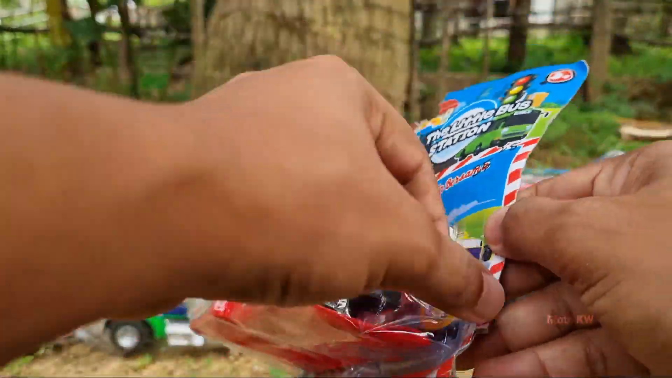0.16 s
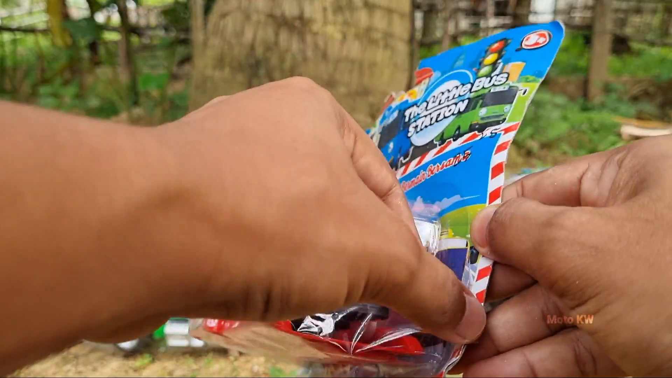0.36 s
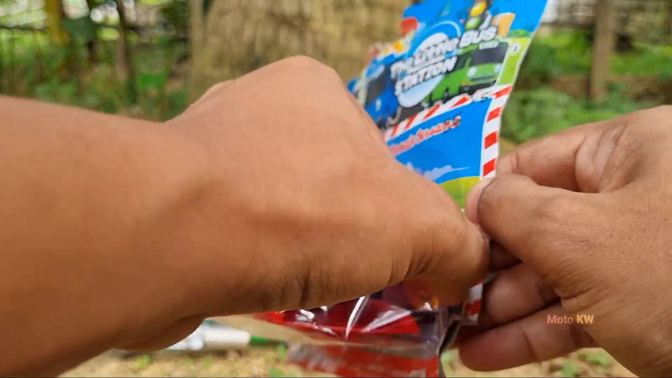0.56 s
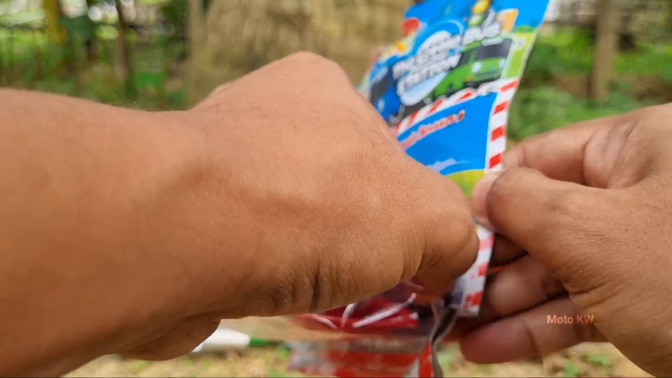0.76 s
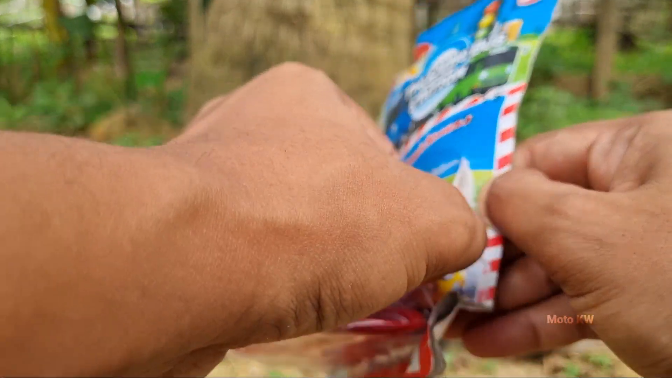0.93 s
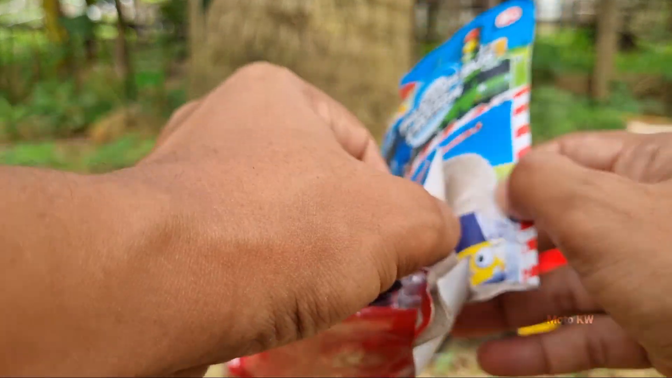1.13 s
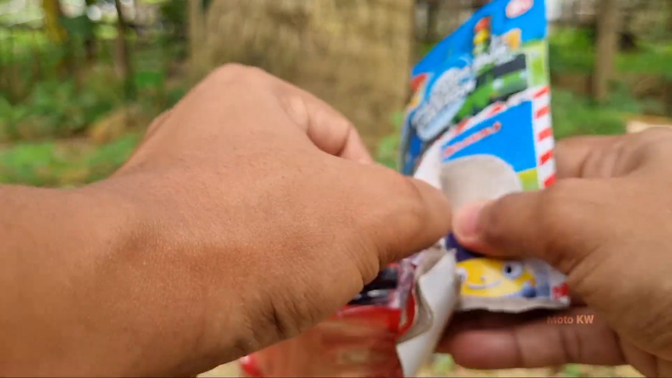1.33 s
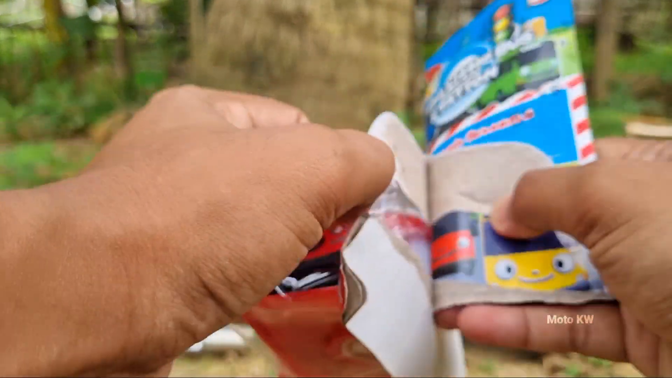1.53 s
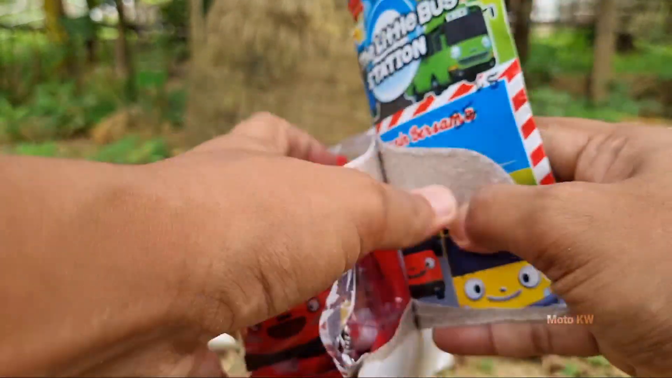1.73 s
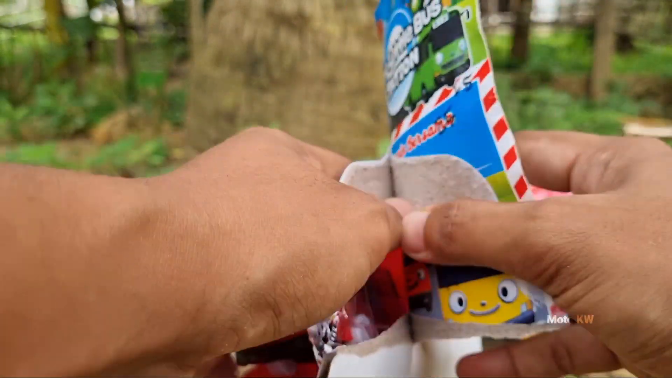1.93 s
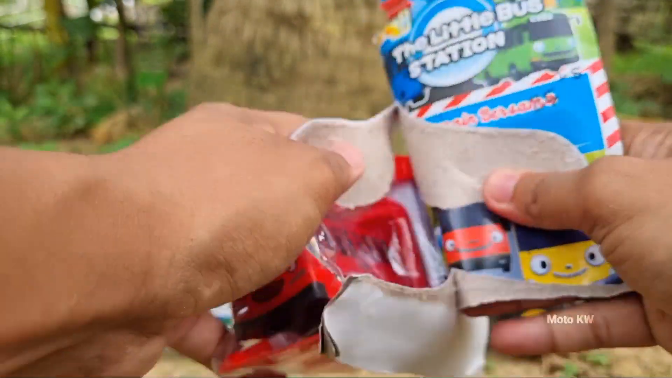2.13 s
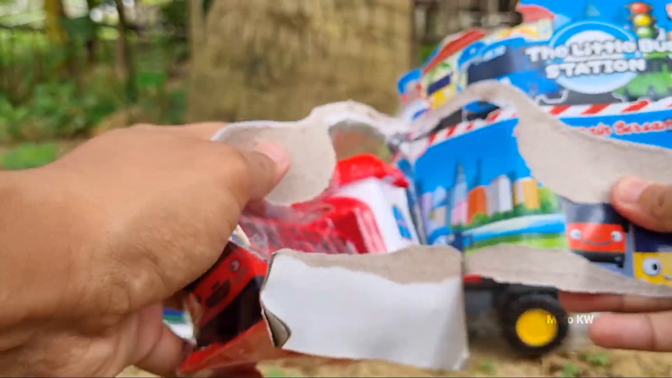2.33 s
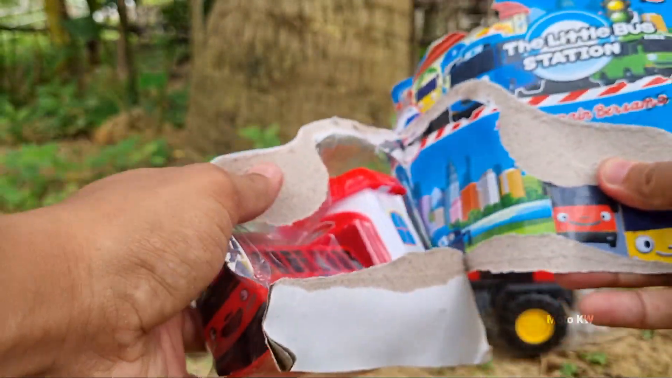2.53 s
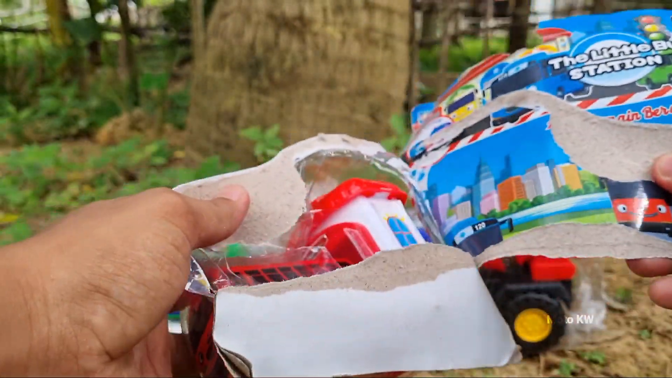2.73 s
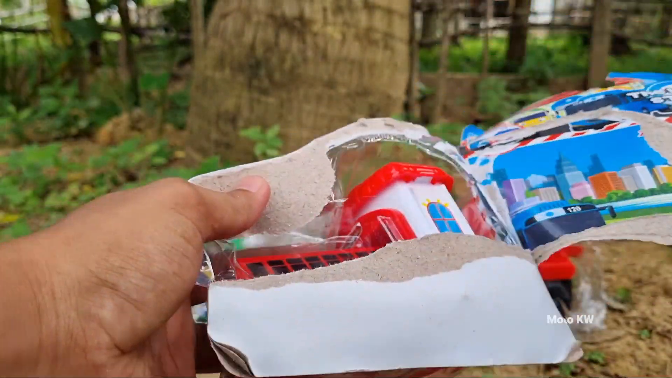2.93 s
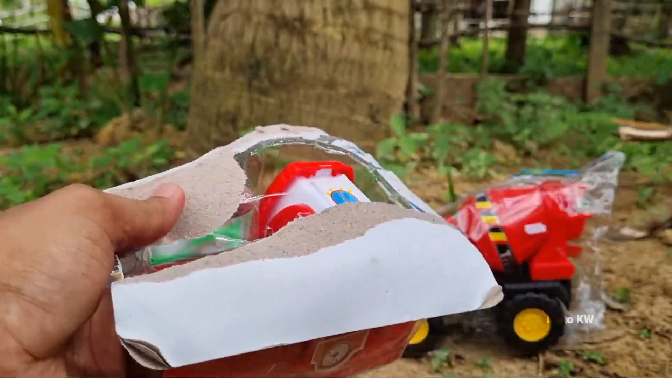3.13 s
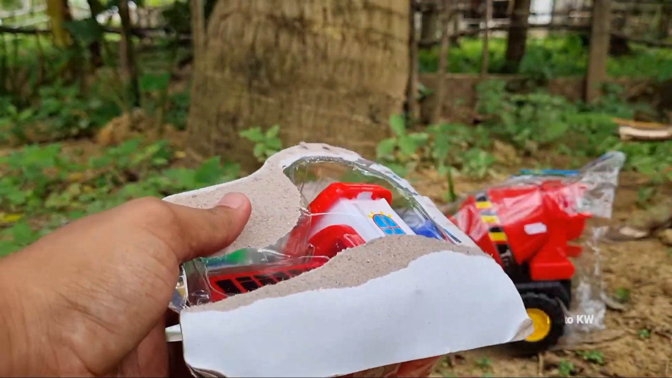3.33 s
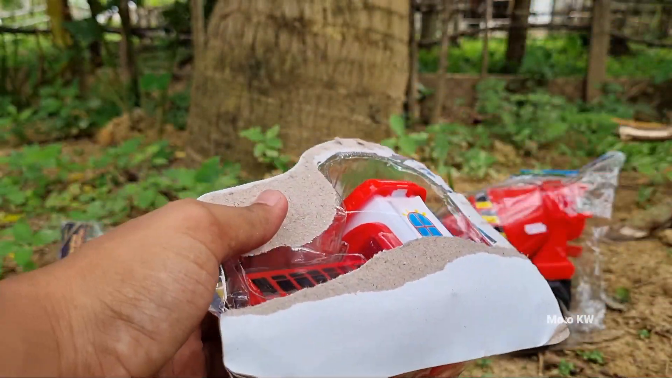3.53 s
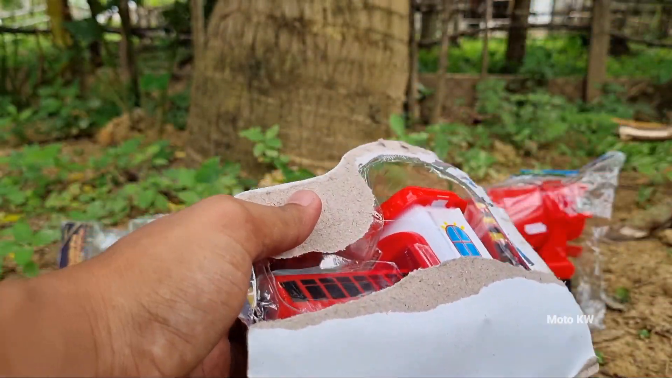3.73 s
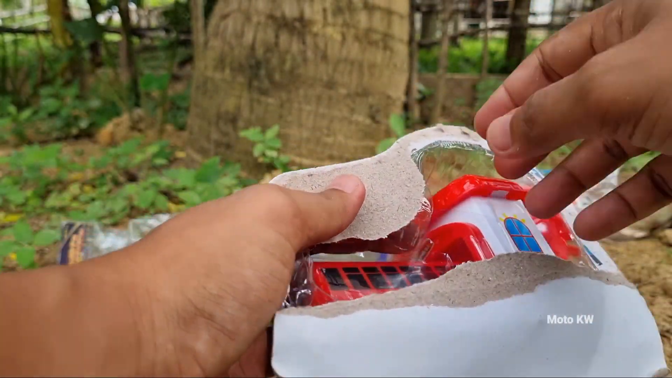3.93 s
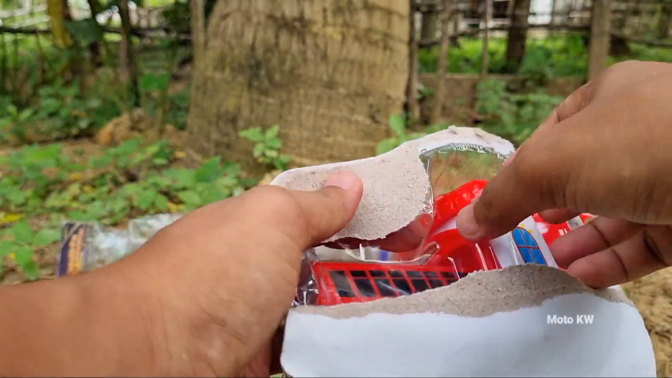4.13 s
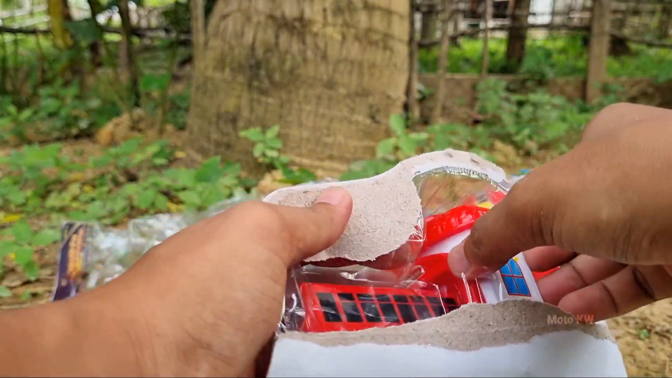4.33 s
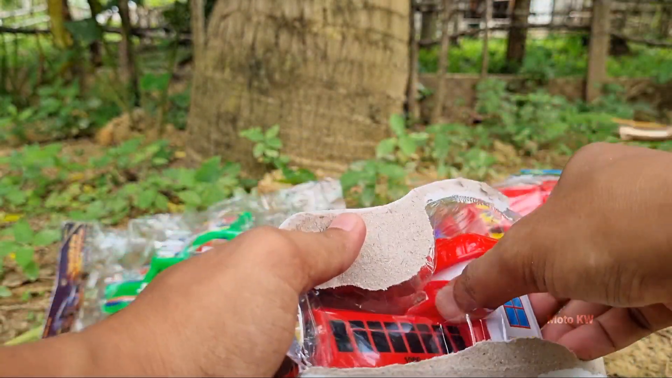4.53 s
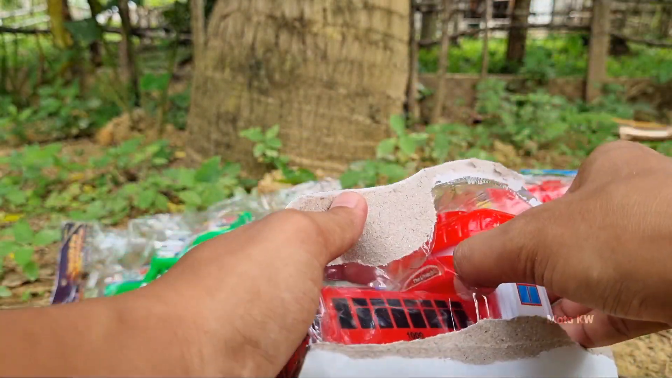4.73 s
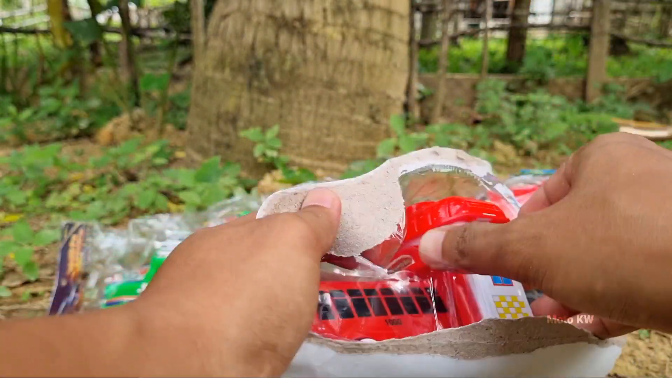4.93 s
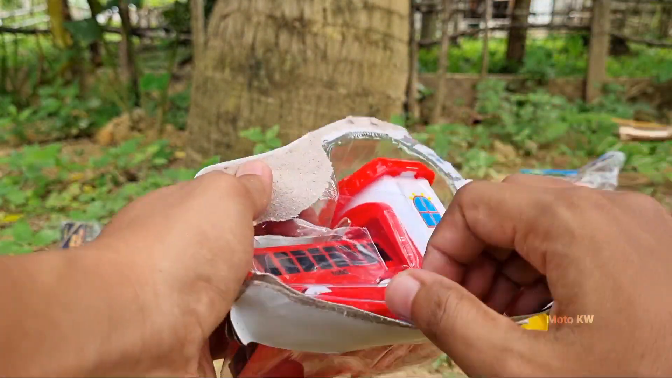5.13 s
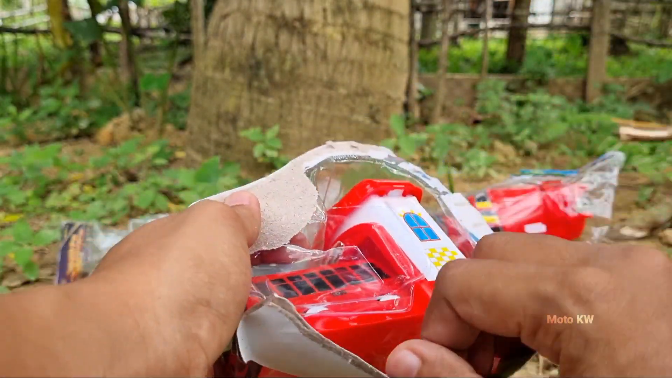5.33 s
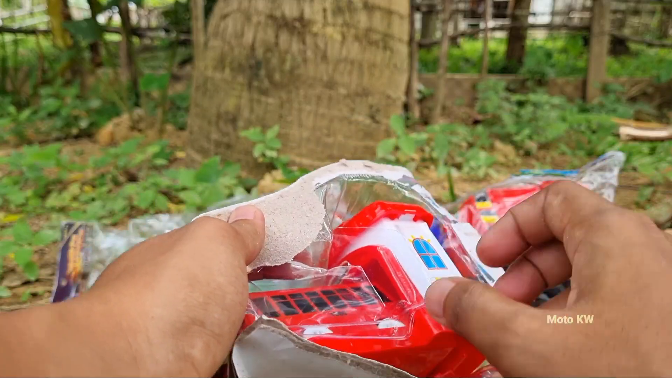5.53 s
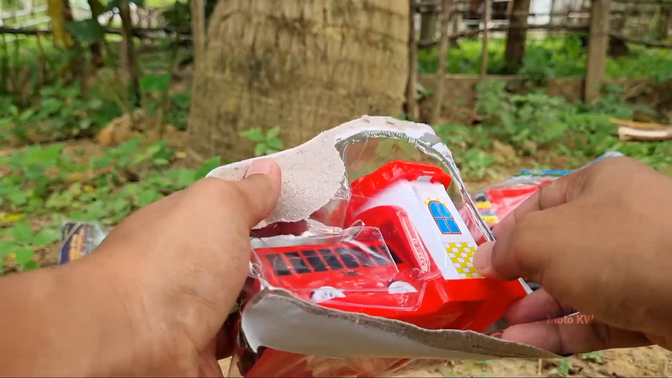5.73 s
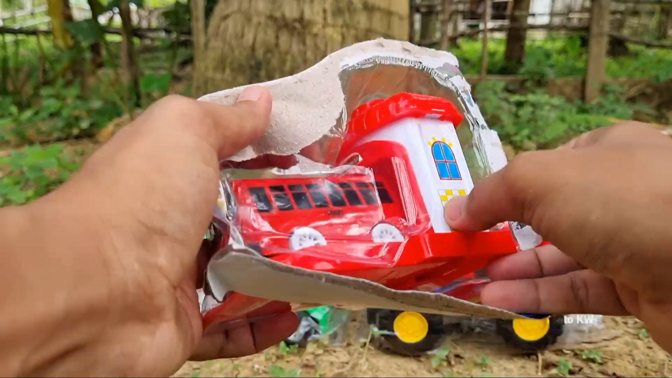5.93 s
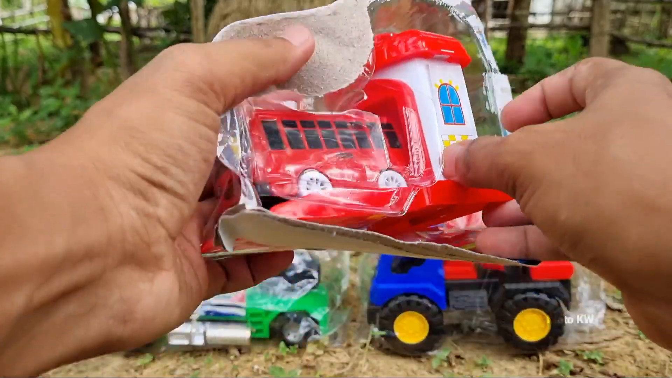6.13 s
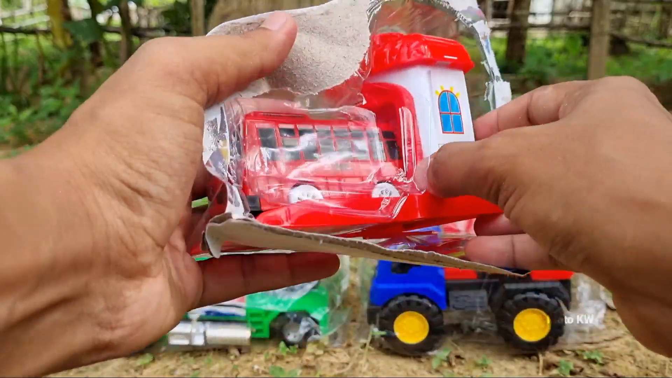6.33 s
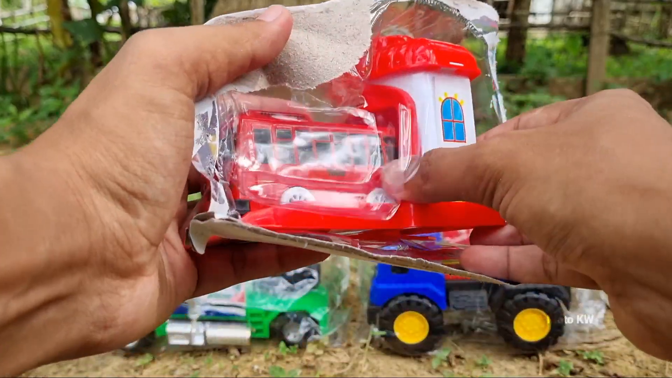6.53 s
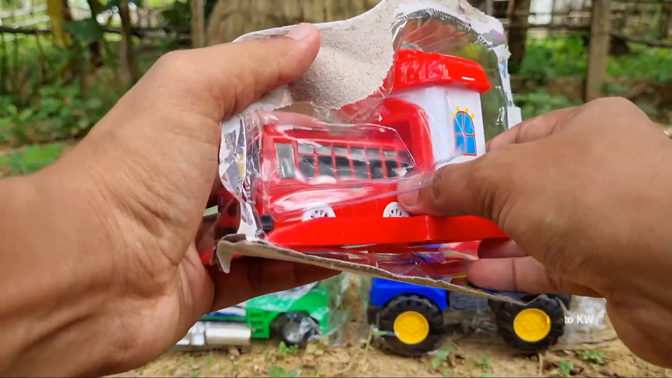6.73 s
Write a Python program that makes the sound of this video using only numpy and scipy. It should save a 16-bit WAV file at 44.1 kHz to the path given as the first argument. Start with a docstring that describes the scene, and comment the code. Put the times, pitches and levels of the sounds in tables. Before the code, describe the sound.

Close up outdoors, hands crackle and snap a plastic blister pack, rip its card backing, then crinkle the plastic over low engine rumble.

```python
"""Out among trees, two hands open a toy's blister pack close by, over far rumble and an engine's low harmonics.
From the start the plastic snaps (a kick plus scattered ringing), rustles (tiny ticks and rubs) and rings low.
From about 0.9 s the cardboard back tears in fizzing pulls, made of thousands of breaking fibres.
Near 2.7 s the loose card slides away in a swish of tiny contacts; then fingers dig and the snaps crowd together.
After 5 s the engine's pitch runs down while the plastic goes on snapping. In the open air nothing reverberates."""
import sys
import numpy as np
from scipy import signal
from scipy.fft import rfft, irfft
from scipy.io import wavfile
from scipy.ndimage import uniform_filter1d

SR = 44100
rng = np.random.default_rng(int(sys.argv[2]) if len(sys.argv) > 2 else 0)


def persist_wave(psi):
    """Save psi, clipped to +-1, as 16-bit WAV."""
    counts = np.round(np.clip(psi, -1, 1) * 32767).astype(np.int16)
    wavfile.write(sys.argv[1], SR, np.atleast_2d(counts).T)


N = 303408


def gain_of(db):
    """Turns decibels into an amplitude factor."""
    return 10 ** (np.asarray(db) / 20)


def evened(x):
    """Scales a sound to an average (rms) strength of 1."""
    return x / np.sqrt(np.mean(x ** 2) + 1e-20)


def read_table(points, hz):
    """Reads a table of values between its listed frequencies, on a log-frequency axis."""
    f, value = np.transpose(points)
    return np.interp(np.log(hz + 1), np.log(f + 1), value)


def add(mix, start_s, sound):
    """Mixes a stereo sound in at its start time."""
    first = max(round(start_s * SR), 0)
    part = mix[:, first:][:, :sound.shape[1]]
    part += sound[:, :part.shape[1]]


def causal(db):
    """Minimum-phase filter with the given gains: it rings after a click, never before."""
    log_gain = np.log(gain_of(np.maximum(db, -100)))
    mirrored = np.r_[log_gain, log_gain[-2:0:-1]]
    return np.exp(np.conj(signal.hilbert(mirrored)))[:len(db)]


def coloured(x, spectrum):
    """Passes a stereo sound through a spectrum table."""
    response = irfft(causal(read_table(spectrum, np.fft.rfftfreq(2048, 1 / SR))))
    return signal.oaconvolve(x, response[None], axes=1)[:, :x.shape[1]]


def band(x, lo, hi):
    """Keeps only the frequencies between lo and hi (Hz), without looking ahead in time."""
    return signal.sosfilt(signal.butter(3, [lo, hi], "band", fs=SR, output="sos"), x)


def slow_chance(length, size):
    """A smooth random wander of rms 1; a larger size (samples) wanders more slowly."""
    once = uniform_filter1d(rng.standard_normal(length), size)
    return evened(uniform_filter1d(once, size))


# how alike left and right are: [f/Hz, likeness from 0 to 1]
LIKENESS = [(700, 0.92), (1400, 0.71), (3000, 0.46), (8000, 0.024)]
# stereo balance: [f/Hz, left minus right level/dB]
BALANCE = [(130, 0.5), (600, 3.5), (8000, -2.5)]


def at_microphones(pair, lag_s):
    """Two unrelated sounds become left and right: alike in the bass, left fuller, right brighter and later."""
    hz = np.fft.rfftfreq(pair.shape[1], 1 / SR)
    a, b = rfft(pair)
    angle = np.arccos(np.clip(read_table(LIKENESS, hz), 0, 1)) / 2
    shared, own = np.cos(angle) * a, np.sin(angle) * b
    lean = gain_of(read_table(BALANCE, hz) / 2)
    left = (shared + own) * lean
    right = (shared - own) / lean * np.exp(-2j * np.pi * hz * lag_s)
    return irfft([left, right], pair.shape[1])


def grains(per_s, spread_db, t60, ring_db, count=24):
    """A shower of tiny breaks of very unequal size; each spot of the sheet rings in its own way."""
    t, hz = np.arange(1024) / SR, np.fft.rfftfreq(1024, 1 / SR)
    happens = rng.random(N) < per_s / SR
    strength = gain_of(spread_db * np.minimum(rng.exponential(1, N), 3))
    size = strength * happens * rng.choice([-1, 1], N)
    spot, out = rng.integers(0, count, N), np.zeros((2, N))
    for k, spot_hz in enumerate(np.geomspace(700, 9000, count)):
        waves = rng.standard_normal((2, len(t))) * gain_of(-60 * t / t60)
        waves[0, 0] += 4.  # the click of the break itself
        resonance = ring_db / (1 + ((hz / spot_hz - 1) / 0.29) ** 2)
        grain = evened(irfft(rfft(waves) * causal(resonance)))
        out += signal.oaconvolve((size * (spot == k))[None], grain, axes=1)[:, :N]
    return at_microphones(out, lag_s=.00006)


def stroke(crest_s, build_s, fade_s, build_shape, fade_shape):
    """Gain of one hand move: up 20 dB over the build, down 20 dB over the fade; higher shapes round the top."""
    t = np.arange(N) / SR - crest_s
    near, gain = (t > -3 * build_s) & (t < 3 * fade_s), np.zeros(N)
    building = abs(t[near] / build_s) ** build_shape
    fading = abs(t[near] / fade_s) ** fade_shape
    gain[near] = gain_of(-20 * np.where(t[near] < 0, building, fading))
    return gain


def effort(rows, build_shape, fade_shape):
    """Gains of the lower and upper band over a series of overlapping hand moves."""
    power = 0
    for crest, build, fade, *levels_db in rows:
        move = stroke(crest, build, fade, build_shape, fade_shape)
        power = power + np.outer(gain_of(levels_db), move) ** 2
    return np.sqrt(power)


# where the lower and upper bands begin and end: [f/Hz]
BAND_EDGES = [300, 4000, 20000]


def played(sheet, low, high):
    """Gives the lower and the upper band of a sound their own gains."""
    lower, upper = band(sheet, *BAND_EDGES[:2]), band(sheet, *BAND_EDGES[1:])
    return evened(lower) * low + evened(upper) * high


# tone of the open air, before levelling: [f/Hz, relative level/dB per Hz]
AIR = [(20, -36), (38, -7), (60, 5), (90, 2.5), (125, -4.5), (250, -6.5), (430, -20.5), (650, -31.5),
       (2000, -29.5), (6300, -33), (8000, -33), (11000, -38), (16000, -40)]
# change in the far rumble: [t/s, relative level/dB]
RUMBLE = [(0, -9.5), (.5, 0), (3.25, -5), (3.7, -1), (4.5, 2), (6.4, -0.5), (6.85, -4)]


def outdoors(level_db=-41.5, swell_db=1.5):
    """A low rumble of far traffic under a faint hiss, made of filtered noise that slowly swells."""
    t = np.arange(N) / SR
    swell = evened(sum(np.sin(2 * np.pi * (f * t + rng.random())) for f in np.geomspace(.5, 5, 10)))
    noise = at_microphones(rng.standard_normal((2, N)), lag_s=0)
    air = evened(coloured(noise, AIR))
    rumble = signal.sosfiltfilt(signal.butter(2, 300, fs=SR, output="sos"), air)
    hiss = air - rumble
    air = hiss + rumble * gain_of(np.interp(t, *np.transpose(RUMBLE)))
    return air * gain_of(level_db + swell_db * swell)


CRUISE_HZ, IDLE_HZ = 85.07, 39.6  # the engine's fundamental, before a slight waver
THROTTLE_OFF_S, RUN_DOWN_S = 5.01, .66  # when it starts to slow, and its time constant
BOOM_HZ, BOOM_WIDTH_HZ, BOOM_DB = 67.4, 10.8, -32.5  # resonance met by the falling fundamental
# the drone's strength, before fading and the share of each harmonic: [t/s, level/dB]
DRONE = [(0, -59.5), (1.22, -53.5), (1.4, -42.5), (2.15, -46.5), (2.27, -60), (3.4, -56.5), (4.25, -46),
         (5.3, -48), (6.2, -50)]


def engine(waver=0.0049, fading_db=3.0, first_db=-9.5, third_db=-11.0):
    """Three low exhaust harmonics fade in moving air; the speed falls exponentially once the throttle shuts."""
    t = np.arange(N) / SR
    since_off = np.maximum(t - THROTTLE_OFF_S, 0)
    hz = IDLE_HZ + (CRUISE_HZ - IDLE_HZ) * np.exp(-since_off / RUN_DOWN_S)
    phase = 2 * np.pi * np.cumsum(hz * (1 + waver * slow_chance(N, size=3000))) / SR
    level = gain_of(np.interp(t, *np.transpose(DRONE)) + fading_db * slow_chance(N, size=3500))
    boom = gain_of(BOOM_DB) / (1 + ((hz - BOOM_HZ) / BOOM_WIDTH_HZ) ** 6)
    first = (level * gain_of(first_db) + boom) * np.sin(phase)
    second = level * np.sin(2 * phase)
    third = level * gain_of(third_db) * np.sin(3 * phase)
    return np.sqrt(2) * (first + second + third) * gain_of([[.7], [-.7]])


# low damped rings of the pack, alone or under a snap or tear:
# [t/s, level/dB before onset, decay and balance, f/Hz]
LOW_RINGS = [(0.106, -28, 300), (.3255, -15, 643), (.548, -24, 223), (2.142, -9.5, 1100), (2.594, -21, 203),
             (3.707, -15, 385),(4.226, -20, 206), (5.425, -9.5, 703), (5.426, -16.5, 224),
             (6.081, -12, 695), (6.297, -28, 366), (6.337, -18, 175), (6.48, -24, 394), (6.587, -21, 328)]


def low_rings(t60=0.033, rise_s=0.00065):
    """The pack rings low: each time one sine tone starts quickly and dies away within hundredths of a second."""
    out, t = np.zeros((2, N)), np.arange(6000) / SR
    for s, db, hz in LOW_RINGS:
        envelope = gain_of(db - 60 * t / t60) * (1 - np.exp(-t / rise_s))
        ring = envelope * np.sin(2 * np.pi * hz * t)
        add(out, s, ring * gain_of([[1.5], [-1.5]]))  # a little stronger on the left
    return out


# tone of the plastic, also used by the snaps: [f/Hz, relative level/dB per Hz]
BLISTER = [(180, -31.5), (300, -6.5), (450, -11.5), (660, 0), (820, -4), (1100, -3), (1470, -7), (1790, -3),
           (4620, -8), (6510, -12), (7790, -8.5), (11500, -21.5), (15000, -20.5)]
# fingers tighten and let go: [crest t/s, build t/s, fade t/s, relative level/dB]
SQUEEZES = [(.13, 0.033, 0.24, -52.5), (.9, 0.21, 0.067, -41), (1.631, 0.023, 0.044, -28),
            (1.85, 0.1, 0.18, -36.5), (2.3, 0.07, 0.084, -29.5), (2.511, 0.11, 0.043, -46),
            (3.72, 0.015, 0.25, -44), (4.22, 0.52, 0.49, -41), (4.345, 0.025, 0.051, -29),
            (4.478, 0.09, 0.12, -36.5), (4.671, 0.14, 0.59, -43.5), (4.965, 0.036, 0.015, -27),
            (5.067, 0.093, 0.029, -26.5), (5.23, 0.17, 0.087, -35.5), (5.45, 0.33, 0.59, -46.5),
            (5.75, 0.26, 0.39, -46), (6.09, 0.11, 0.036, -37), (6.154, 0.04, 0.12, -35.5),
            (6.35, 0.077, 0.11, -37), (6.464, 0.03, 0.062, -29.5), (6.612, 0.034, 0.044, -27.5)]
HOLDING_DB = -58.5  # on the same relative scale: the pack stirs even between squeezes


def rustle(level_db=3.0, rub_db=-4.0, tilt_db=-5.0, thud_db=-12.0, uneven_db=3.0):
    """Small creases tick in the plastic, skin rubs over it and the pack thuds softly in the hands."""
    ticks = evened(grains(per_s=240, spread_db=4.5, t60=.015, ring_db=11.))
    rub = evened(grains(per_s=2500, spread_db=3.5, t60=.012, ring_db=4.))
    sheet = coloured(ticks + gain_of(rub_db) * rub, BLISTER)
    sheet = coloured(sheet, [(700, 0), (3500, tilt_db)])  # duller above 700 Hz
    thud = band(at_microphones(rng.standard_normal((2, N)), lag_s=0), 90.0, 354)
    power = gain_of(HOLDING_DB) ** 2
    for crest, build, fade, db in SQUEEZES:
        squeeze = stroke(crest, build, fade, build_shape=1.15, fade_shape=1.16)
        power = power + (gain_of(db) * squeeze) ** 2
    grip = np.sqrt(power) * gain_of(level_db + uneven_db * slow_chance(N, size=600))
    return (evened(sheet) + gain_of(thud_db) * evened(thud)) * grip


# tone of the card, also used by the tearing: [f/Hz, relative level/dB per Hz]
CARD = [(180, -13.5), (300, -7), (430, -16), (580, 0.5), (780, -4.5), (1100, 0), (1450, -4), (1800, 0.5),
        (2870, -4), (8320, -4.5), (11500, -11), (14500, -11.5)]
# loose card slides off over the plastic:
# [crest t/s, build t/s, fade t/s, rub level/dB under 4 kHz, swish level/dB above]
SLIDES = [(2.66, 0.089, 0.27, -44.5, -39), (2.86, 0.18, 0.72, -57, -46.5),
          (3.058, 0.1, 0.016, -35.5, -31.5)]


def slide():
    """Card brushes over plastic: contacts so many and so even that they merge into a fluttering swish."""
    contacts = coloured(grains(per_s=6000, spread_db=3., t60=.008, ring_db=3.), CARD)
    fluttering = contacts * gain_of(1.5 * slow_chance(N, size=600))
    low, high = effort(SLIDES, build_shape=1.3, fade_shape=0.81)
    return played(fluttering, low, high)


FLIP_RISE_S, LEAD_S = .0003, .02  # speed of a flip; room kept before it for the soft swell


def buckling(t, t60=0.02, lesser_db=-22.0, scatter_s=0.00605, lead_in_db=-21, count=4):
    """Strength of one buckle: the flip, lesser creases giving way after it, and a faint soft swell around it."""
    delays = np.r_[0, scatter_s * abs(1 + rng.standard_normal(count))]
    age = t - delays[:, None]
    size = gain_of(np.r_[0, lesser_db - 5 * rng.exponential(1, count)])[:, None]
    onset = (1 + np.tanh(age / FLIP_RISE_S)) / 2
    flips = size * onset * gain_of(-60 * np.maximum(age, 0) / t60)
    swell = gain_of(lead_in_db - 60 * abs(t) / .018)
    return np.sqrt((flips ** 2).sum(0) + swell ** 2)


def snap(crack_db, sizzle_db, panel_hz, kick=2.8, kick_growth=0.79, panel_db=8.5, panel_octaves=0.2,
         overtone=1.82, overtone_db=2.0, skirt_db=2.0, lag_s=.00006, damping_db_per_s=300):
    """A panel flips: a kick, cleaner the harder it is, then scattered bending waves die, treble first."""
    t, hz = np.arange(3072) / SR - LEAD_S, np.fft.rfftfreq(3072, 1 / SR)
    waves = rng.standard_normal((2, len(t))) * buckling(t)
    kick_size = kick * gain_of(kick_growth * (crack_db + 23))
    waves[0, np.searchsorted(t, FLIP_RISE_S)] += kick_size * rng.choice([-1, 1])
    # the panel's main resonance, an overtone, then lesser ones at random
    octaves = np.log2(np.clip(hz, *BAND_EDGES[:2]) / panel_hz)
    main = panel_db / (1 + (octaves / panel_octaves) ** 2)
    upper = overtone_db / (1 + ((octaves - np.log2(overtone)) / panel_octaves) ** 2)
    ring_db = main + upper - skirt_db * abs(octaves) + 1.5 * slow_chance(len(hz), size=20)
    shell = irfft(rfft(waves) * causal(read_table(BLISTER, hz) + ring_db))
    shell = at_microphones(shell, lag_s * (1 + rng.standard_normal()))
    crack = band(shell, *BAND_EDGES[:2])
    sizzle = band(shell, *BAND_EDGES[1:]) * gain_of(-damping_db_per_s * np.maximum(t, 0))
    both = evened(crack) * gain_of(crack_db) + evened(sizzle) * gain_of(sizzle_db)
    return both * np.sqrt(.01 * SR / len(t))  # levels count as if the energy filled 10 ms


# the blister buckles:
# [t/s, crack level/dB under 4 kHz, sizzle level/dB above (both before a small lift), panel f/Hz]
SNAPS = [(0.1076, -28.5, -53, 1440), (0.3246, -15, -25, 2270), (0.416, -28.5, -62, 876),
         (0.534, -33.5, -34, 935), (0.545, -20, -25, 1790), (0.5662, -30.5, -48, 920),
         (0.695, -41.5, -46, 1030), (0.716, -49, -40, 2300), (0.7764, -40, -34.5, 890),
         (0.819, -34, -38.5, 1460), (0.8821, -25, -35, 1880), (0.921, -39, -42, 1500),
         (0.941, -25, -37, 1030), (0.973, -27, -52, 1150), (1.0297, -18.5, -28, 990),
         (1.049, -35, -20.5, 1570), (1.0588, -35, -21, 1400), (1.0803, -21, -24, 1510),
         (1.113, -33, -29, 1530), (1.132, -34.5, -30, 1550), (1.1729, -32.5, -39.5, 3170),
         (1.293, -28, -58, 1170), (1.322, -40, -37, 3840), (1.368, -19, -22, 2760),
         (1.404, -24, -24.5, 2330), (1.5003, -21.5, -42, 860), (1.576, -26.5, -41, 1980),
         (1.6051, -26, -36, 2320), (1.6093, -20, -33, 1500), (1.639, -24, -23.5, 935),
         (1.737, -33.5, -54, 1630), (1.818, -26.5, -21, 1970), (1.8351, -20, -31, 2130),
         (1.87, -25.5, -28, 2400), (1.9161, -27.5, -41, 1130), (2.0147, -32, -36, 2800),
         (2.0246, -28, -32, 2770), (2.127, -19, -24, 1040), (2.1418, -16.5, -38, 1810),
         (2.249, -24.5, -24, 1600), (2.3409, -29, -30.5, 1610), (2.4051, -32.5, -44, 1430),
         (2.465, -42.5, -35.5, 4027), (2.506, -24.5, -35, 584), (2.5128, -39, -34, 1265),
         (2.533, -42, -35.5, 1600), (2.573, -25.5, -31.5, 2280), (2.5913, -23.5, -36, 794),
         (2.849, -41, -40, 1490), (2.9185, -35.5, -47, 1470), (3.012, -34.5, -45, 1460),
         (3.0401, -29.5, -41, 620), (3.1589, -29, -31.5, 1630), (3.2038, -33.5, -57, 1050),
         (3.2339, -31, -45, 4000), (3.2939, -33, -42.5, 2720), (3.336, -32, -37, 910),
         (3.388, -31.5, -30.5, 3020), (3.4453, -50, -40.5, 4050), (3.7081, -27.5, -42.5, 890),
         (3.7554, -34, -61, 1650), (3.8466, -22.5, -33.5, 1490), (3.955, -39, -61, 1220),
         (4.036, -23.5, -33.5, 720), (4.052, -33, -36, 2300), (4.081, -25, -28, 2100),
         (4.106, -30, -60, 1500), (4.1135, -28, -28.5, 1550), (4.2247, -21, -45, 1670),
         (4.246, -29.5, -32.5, 940), (4.29, -25, -37.5, 1580), (4.3174, -28, -23.5, 1610),
         (4.322, -21.5, -22, 2400), (4.3576, -22.5, -32, 990), (4.415, -27.5, -44, 1380),
         (4.4674, -20, -22, 2220), (4.4862, -25.5, -30, 1280), (4.514, -31, -25.5, 2590),
         (4.522, -28.5, -24.5, 4140), (4.5597, -24.5, -34, 620), (4.591, -18.5, -26.0, 3180),
         (4.7161, -17.5, -27.5, 1030), (4.7734, -24, -23.5, 1230), (4.7908, -23, -42, 1520),
         (4.802, -18, -23.5, 2550), (4.8796, -30, -49, 1380), (4.8971, -21, -25.5, 4200),
         (4.9128, -24.5, -35, 3400), (4.9478, -19.5, -30.5, 1840), (4.9556, -22, -44, 1170),
         (5.005, -24.5, -34.5, 1170), (5.0686, -22.5, -25, 3400), (5.0876, -31.5, -36, 2850),
         (5.1773, -27, -23, 1250), (5.186, -25, -30, 3550), (5.2073, -23, -24, 4370),
         (5.2268, -17, -26, 3160), (5.24, -26.5, -22, 980), (5.277, -44, -37.5, 1300),
         (5.314, -30, -51, 780), (5.3382, -28.5, -49, 1230), (5.3727, -31.5, -28.5, 2280),
         (5.39, -49, -32.5, 3300), (5.4257, -23, -33.5, 755), (5.527, -40.5, -39.5, 1480),
         (5.75, -30, -47, 2340), (5.849, -33, -37, 1500), (5.919, -33, -67, 1240), (5.957, -25, -38, 4500),
         (5.9868, -31, -37.5, 2850), (6.0333, -34, -37, 3550), (6.0814, -32, -45, 655),
         (6.1605, -27, -57, 770), (6.1705, -27.5, -24, 3340), (6.1737, -23, -25, 3420),
         (6.1819, -22, -32, 647), (6.253, -29, -51, 816), (6.296, -21, -20.5, 1860),
         (6.334, -28.5, -39, 1090), (6.3459, -20, -16, 1070), (6.3658, -27, -24.5, 2850),
         (6.4195, -31, -49.5, 1620), (6.4397, -21, -29.5, 2450), (6.456, -27, -19, 1650),
         (6.462, -30, -23.5, 1480), (6.4808, -21.5, -21, 4370), (6.514, -21.5, -27.5, 1460),
         (6.5845, -29.5, -49, 1060), (6.5989, -23.5, -21.5, 2660), (6.608, -25.5, -20, 2800),
         (6.627, -25, -24, 665), (6.68, -24.5, -27.5, 2320), (6.8708, -24.5, -39.5, 850)]


def blister(crack_lift_db=0.13, sizzle_lift_db=1.0):
    """The thin plastic shell snaps whenever one of its panels flips."""
    out = np.zeros((2, N))
    for s, crack_db, sizzle_db, panel_hz in SNAPS:
        add(out, s - LEAD_S, snap(crack_db + crack_lift_db, sizzle_db + sizzle_lift_db, panel_hz))
    return out


# pulls on the card, each building to a crest and giving way:
# [crest t/s, build t/s, fade t/s, rasp level/dB under 4 kHz, fizz level/dB above]
PULLS = [(.90, 0.058, 0.17, -64, -39.5), (1.04, 0.073, 0.16, -29.5, -27.5), (1.42, 0.14, 0.22, -37, -34.5),
         (1.511, 0.11, 0.018, -32.5, -30.5), (2.17, 0.088, 0.068, -23.5, -26.5),
         (2.274, 0.12, 0.17, -34.5, -29)]
# a bundle of card fibres gives way at once: [t/s, rasp level/dB under 4 kHz, fizz level/dB above]
RIPS = [(1.017, -42, -19), (1.032, -16, -15.5), (1.041, -11.5, -18), (1.4205, -17.5, -30),
        (1.5144, -22, -21), (2.1617, -15, -19), (2.168, -18, -17), (2.1797, -18, -19), (2.188, -26, -18.5),
        (2.19, -26.5, -28), (2.269, -15, -23)]


def card(rip_t60=0.041):
    """Paper fibres part by the thousand and ring the stiff sheet; a sharp surge comes as a bundle breaks."""
    fibres = coloured(grains(per_s=2800, spread_db=5., t60=.007, ring_db=6.), CARD)
    fibres = fibres * gain_of(1.5 * slow_chance(N, size=150))
    surges, dying = np.zeros((2, N)), gain_of(-60 * np.arange(SR) / SR / rip_t60)
    for s, *levels_db in RIPS:
        add(surges, s, np.outer(gain_of(levels_db), dying))  # rows: lower and upper band
    low, high = np.hypot(effort(PULLS, build_shape=1.77, fade_shape=1.22), surges)
    return played(fibres, low, high)


def scene():
    """The open air and the engine behind the pack in the hands."""
    background = outdoors() + engine()
    pack = low_rings() + rustle() + slide() + blister() + card()
    return background + pack


def record(dry):
    """Clips the loudest peaks at 0.95, then takes off the treble above about 15.9 kHz."""
    held = np.clip(dry, -.95, .95)
    low_pass = signal.firwin(255, 15900, window=("kaiser", 9), fs=SR)
    return signal.oaconvolve(held, low_pass[None], "same")


dry = scene()
out = record(dry)
persist_wave(out)
```